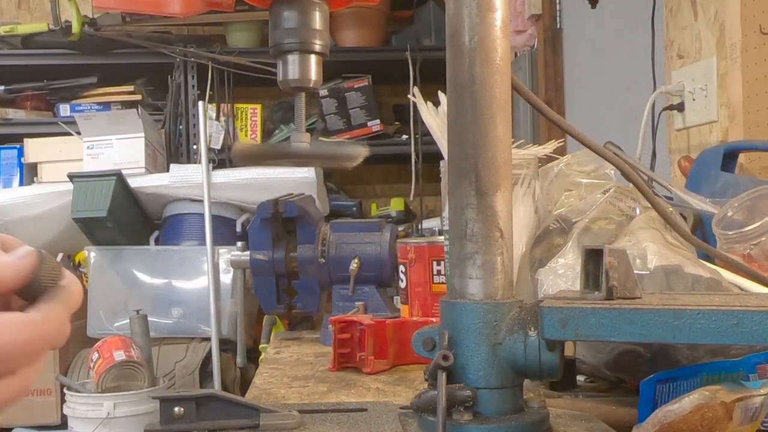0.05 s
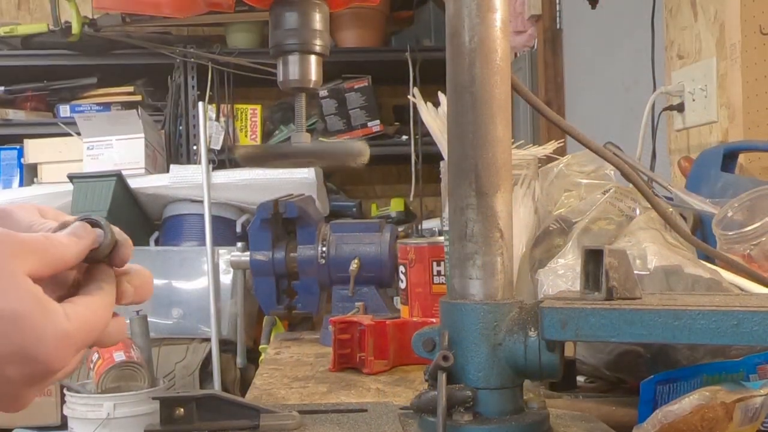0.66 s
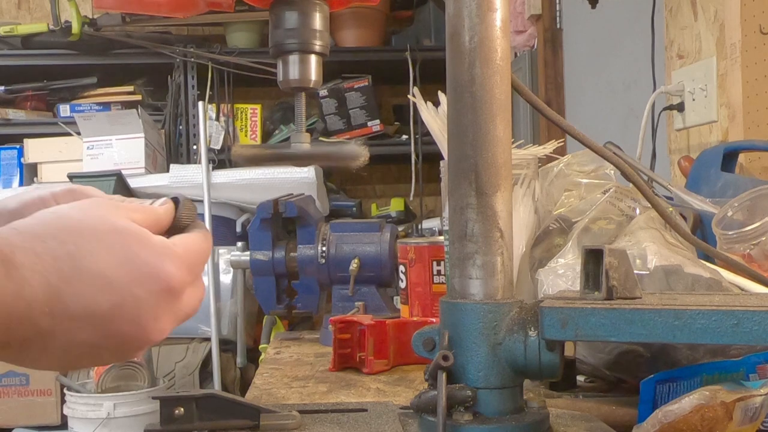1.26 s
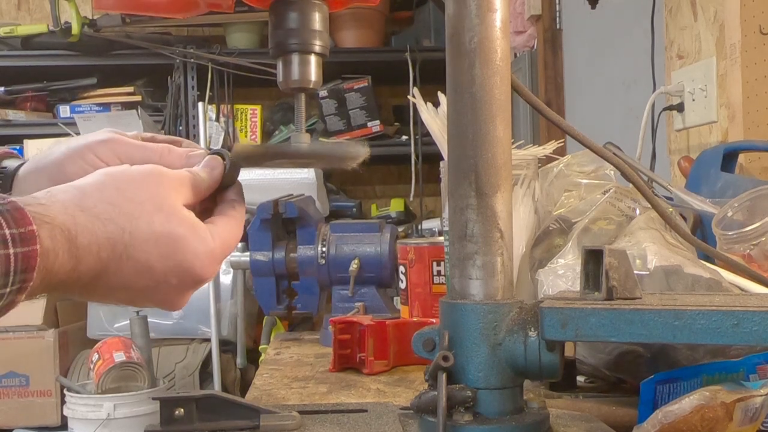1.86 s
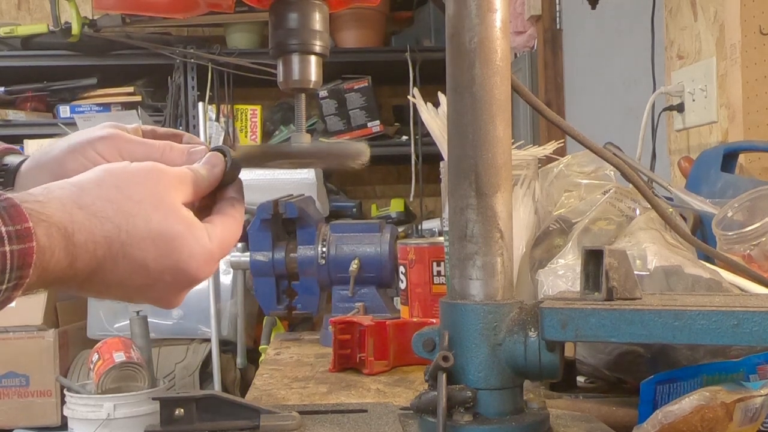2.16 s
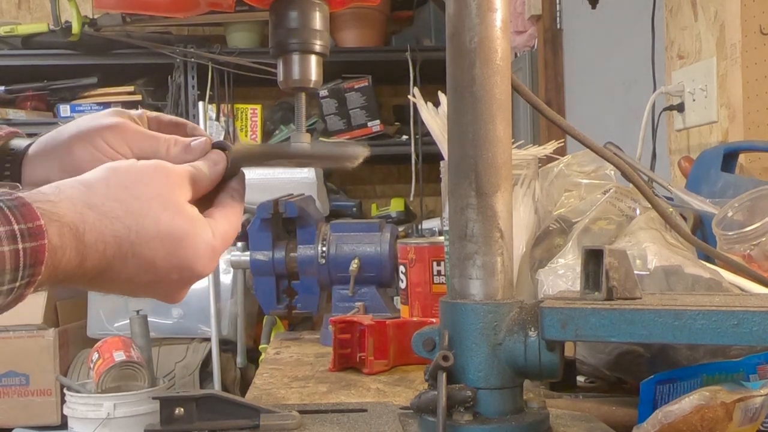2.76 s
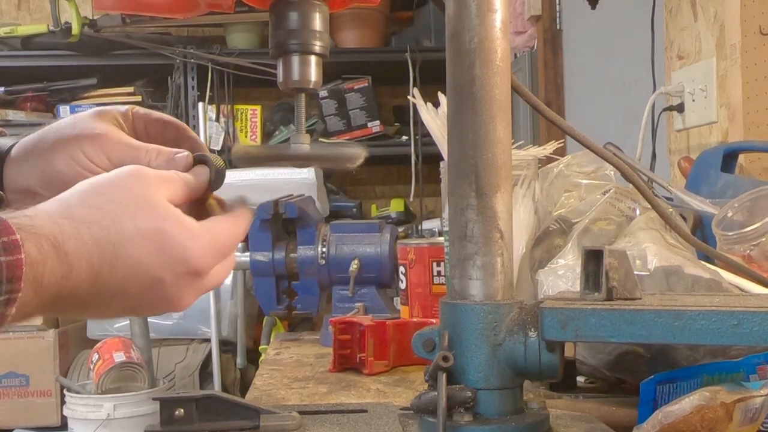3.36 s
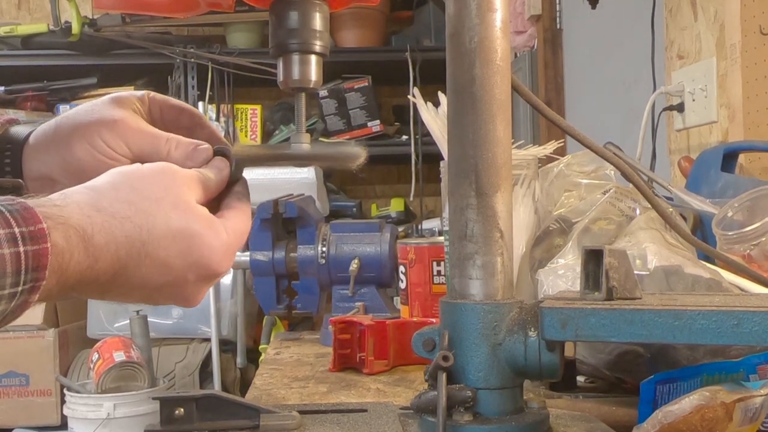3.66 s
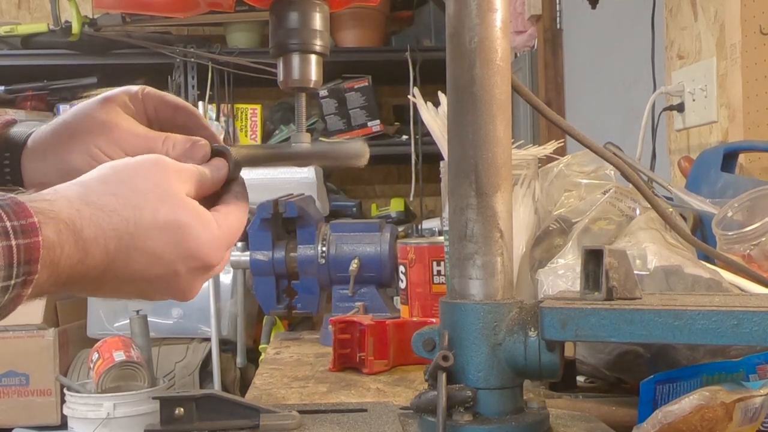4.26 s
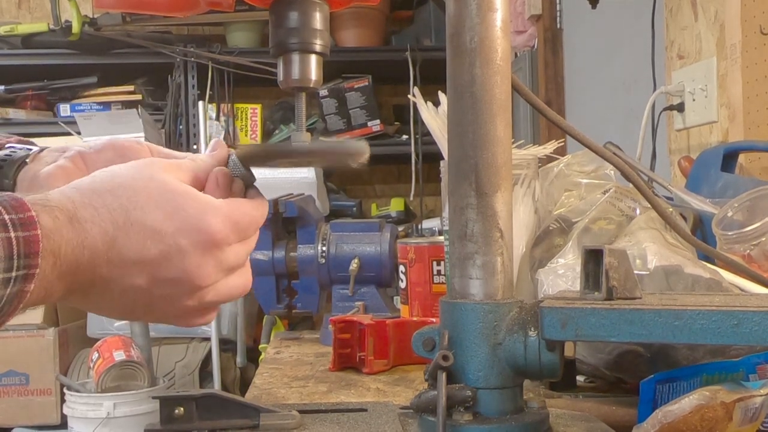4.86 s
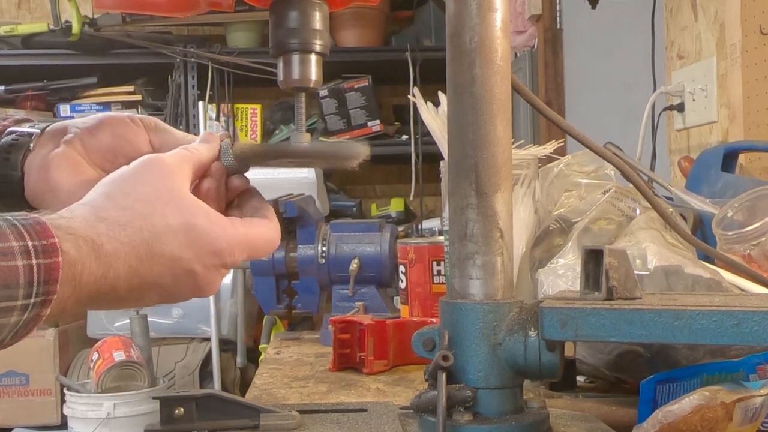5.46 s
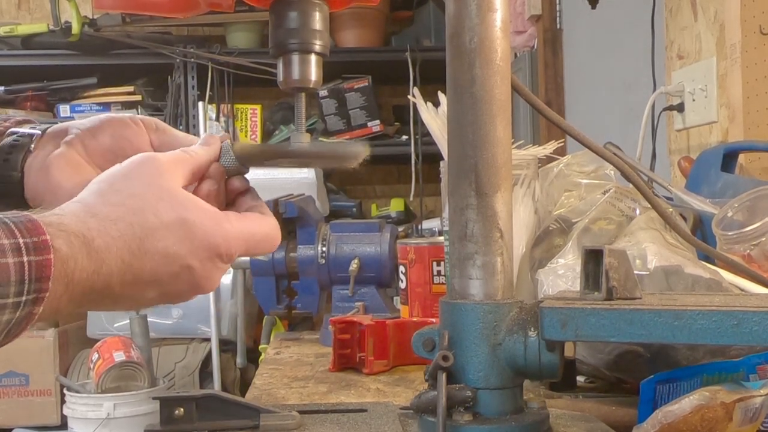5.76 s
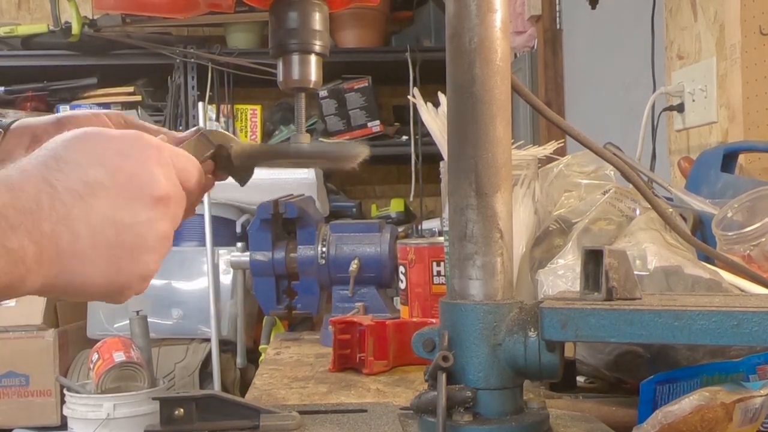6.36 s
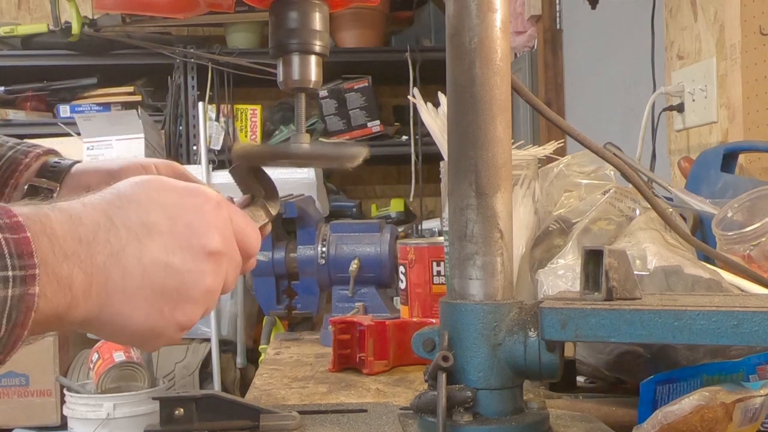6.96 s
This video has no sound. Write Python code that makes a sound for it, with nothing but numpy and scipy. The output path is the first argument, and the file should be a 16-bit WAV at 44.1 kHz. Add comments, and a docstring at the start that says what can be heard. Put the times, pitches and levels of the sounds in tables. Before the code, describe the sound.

A workshop drill press with a wire brush drones low, then switches into fast-forward, a shrill warbling whine over hissing rattle.

```python
"""In a workshop, a stereo microphone pair by a belt-driven drill press, the left side slightly nearer.
The wire wheel spins from the start: the motor hums and beats slowly against the mains, belt and spindle
throb, the iron frame rattles, the bristles tick. From about 1.75 s a steel tool is held to the wheel
and a drone swells. At 2.7 s comes fast-forward: the machine's pitches and rhythms jump up tenfold.
From 4.4 s the hand eases off and leans in again four times; at 6 s there is one faint dull tick."""
import sys
import numpy as np
from scipy import signal
from scipy.fft import rfft, irfft, next_fast_len
from scipy.io import wavfile

SR = 44100
rng = np.random.default_rng(int(sys.argv[2]) if len(sys.argv) > 2 else 0)


def to_wav(s):
    """Save 16-bit WAV."""
    ch = np.atleast_2d(s).T  # columns
    pcm = np.round(np.clip(ch, -1, 1) * 32767)  # PCM
    wavfile.write(sys.argv[1], SR, pcm.astype(np.int16))


N = 318402

FORWARD_AT_S, FORWARD_SPEED = 2.686, 10  # the machine's frequencies are all given at natural pace
MAINS_HZ, POLES, BELT_LOOPS_PER_TURN = 60, 4, .17252

# Partials of belt and spindle: multiple of the loop rate, level/dB, left minus right/dB, left lead/rad
BELT_TONES = [(4, -84.5, 6, 1.5), (5, -76.5, -15, -4.5), (6, -62.5, 9, 1.5), (7, -49.5, 17, -1.0),
              (8, -76, -4, -1.5), (9, -61, -2, -1.1), (10, -68.5, -6, 2), (12, -80, -1, 3),
              (13, -60, -6.5, 4), (14, -63, 11, 2.5), (15, -75, 12, 1), (16, -71, 6, 2),
              (19, -60.5, -2.5, -2.5), (21, -54, 15, -3)]
# Partials of the motor shaft: multiple of the turn rate, level/dB, left minus right/dB, left lead/rad
SHAFT_TONES = [(1, -68, -8, -1.8), (2, -58, -3, -0.2), (3, -61, 9, 0.4), (4, -42, 3, -0.3),
               (5, -50, 1, -0.2), (6, -48, 0, -0.0), (7, -58, 1, -0.4), (8, -53, 3, -0.2)]
# Magnetic hum: multiple of twice the mains frequency (120 Hz), level/dB, left minus right/dB,
# left lead/rad
HUM_TONES = [(1, -41, -9, -.1), (2, -50, 0, .1), (3, -43.5, 0, 0), (5, -56, -7, 1.1), (6, -57, 4, -2.5)]
# Bearings and pulleys: f/Hz, level/dB, left minus right/dB, left lead/rad
BEARING_TONES = [(74.3, -67, 20, -1.0), (84.0, -64, 12, 0.6), (132.6, -60, 1, -0.0), (149.5, -55, 0, 0.1),
                 (165.9, -61, 1, -0.3), (208.9, -58, 3, -0.2), (324.1, -56, -1, 0.0), (395.7, -50, -2, 0.1),
                 (405.9, -46, -2, 0.2), (410.7, -54, -2, 0.1), (433.9, -55, -3, 0.3),
                 (525.9, -58, -3, -0.1), (995.4, -56, -6, -0.2)]
# Broad colour of the rattle: f/Hz, level per Hz/dB
RATTLE_COLOUR = [(8, -95), (20, -93), (50, -81), (80, -75), (110, -64.5), (220, -68), (400, -54),
                 (640, -74), (900, -72.5), (1800, -77), (5000, -78), (7500, -91), (10500, -93.5),
                 (14800, -113.4)]
# Resonances and dips of frame, belt guard and table: f/Hz, width/Hz, gain/dB
FRAME_RESONANCES = [(120.5, 3.8, 6.5), (160.4, 6.2, 6), (291, 140, -2), (344.8, 17.6, -10),
                    (392.4, 52, -4.5), (591, 27, 5), (725, 36, 5.5), (901, 64, 6), (995, 31, 12),
                    (1058, 46, 9.5), (1167, 112, 12), (1220, 28, -5), (1357, 82, 13), (1455, 21, 5),
                    (1554, 53, 9), (1826, 41, 10), (2196, 31, 12.5), (2770, 420, 6.5), (3130, 86, -11),
                    (3500, 160, 4), (4050, 580, 5.5), (5030, 58, 9.5), (5800, 660, 5), (9140, 450, 8)]
# Colour of the bristle ticks: f/Hz, level per Hz/dB
BRISTLE_COLOUR = [(500, -100), (2500, -80.5), (5000, -84), (7500, -119), (10500, -99), (15000, -119)]
# Drone of table and tool under pressure: f/Hz, level per Hz/dB
DRONE_COLOUR = [(100, -110), (190, -86), (245, -69.5), (300, -82), (600, -110)]
# Spread of the noise at the microphones: f/Hz, side minus mid/dB, left minus right/dB
STEREO_SPREAD = [(30, 1, 0.5), (86, -20, 9.5), (124, -15, -0.5), (200, -12.5, 2.5), (397, -15.5, -1.5),
                 (660, 1, -3), (1140, -12.5, -1), (1400, -5.5, 5), (2380, -8.5, -2), (4140, -11, 0),
                 (6460, 2.5, -6), (15000, -5.5, 2)]
# The shaft slips behind half the mains frequency, more once the tool presses: t/s, slip/Hz
STEADY_SLIP = [(0, .311), (1.3, .282), (2.1, .358), (4.3, .351), (5.7, .413), (7.2, .424)]
# The motor's vibration, apart from the easings: t/s, level/dB
MOTOR_VIBRATION = [(0, 0.5), (1.4, 1.5), (3.3, 1), (4.3, -0.1), (7.2, -0.7)]
# The hand eases the tool off the wheel and leans in again: middle t/s, length/s, slip relieved/Hz
HAND_EASES = [(4.68, .52, .075), (5.30, .52, .110), (6.01, .38, .115), (6.61, .55, .107)]
# A faint dull tick: t/s, peak level/dB, decay/s
DULL_TICKS = [(6.023, -30, .0001)]


def undb(db):
    """Decibels to gain."""
    return 10 ** (np.asarray(db) / 20)


def over_hz(table, hz):
    """Columns of a table, joined by straight lines on a log-frequency axis."""
    points, *columns = np.transpose(table)
    return [np.interp(np.log(hz + 1), np.log(points), column) for column in columns]


def walk(axis, rate):
    """Smooth chance with spread near 1 that changes rate times per unit of the axis."""
    knots = rng.standard_normal(4096)
    place = (axis - axis[0]) * rate
    k, ease = place.astype(int), np.sin(np.pi / 2 * (place % 1)) ** 2
    return 1.15 * (knots.take(k, mode="wrap") * (1 - ease) + knots.take(k + 1, mode="wrap") * ease)


def tone(turns, db, pan_db, lead):
    """One partial as the two microphones get it; db is its rms level."""
    gains = undb(np.array([[pan_db], [-pan_db]]) / 2)
    angle = 2 * np.pi * (turns % 1) + np.array([[lead], [-lead]]) / 2
    return 2 * undb(db) * gains / np.linalg.norm(gains) * np.cos(angle)


def radiate(drive, colour, speed, resonances=(), top_hz=15000, left_lead_s=1.4e-5):
    """Colour a white mid and side drive and carry it to the microphones; Hz and s hold at speed 1."""
    count = drive.shape[1]
    size = next_fast_len(count)
    hz = np.fft.rfftfreq(size, 1 / SR) / speed
    db = over_hz(colour, hz)[0]
    db += sum(peak / (1 + (2 * (hz - f) / width) ** 2) for f, width, peak in resonances)
    db += .95 * walk(hz, 1 / 11)  # reflections from bench and shelves comb the spectrum finely
    mid, side = rfft(drive, size) * undb(db) * (hz < top_hz) * np.sqrt(SR / 2 / speed)
    side_db, pan_db = over_hz(STEREO_SPREAD, hz)
    side *= undb(side_db)
    left = (mid + side) * undb(pan_db / 2) * np.exp(2j * np.pi * hz * left_lead_s)
    right = (mid - side) * undb(-pan_db / 2)
    return irfft(np.array([left, right]), size)[:, :count]


def motor(clock, shaft, swell_db, pressure_db, waver_db=1.2, sideband_db=-54, sideband_turns=.634):
    """The shaft's fourth partial beats against twice the mains frequency; more slip, faster beat."""
    uneven = shaft + .0087 * walk(clock, 9)
    field = 2 * MAINS_HZ * clock
    # the pole-pass partial and its octave lock to the field; the rest cross the frame at any phase
    locked = {POLES: 0, 2 * POLES: 2 * sideband_turns - .5}
    out = 0
    for k, db, pan, lead in SHAFT_TONES:
        offset = locked[k] if k in locked else rng.random() + .076 * walk(clock, 2)
        out += tone(k * uneven + offset, db + swell_db + waver_db * walk(clock, 6.5), pan, lead)
    for k, db, pan, lead in HUM_TONES:
        # the lowest hum shakes the housing and swells with it; its overtones hold steady
        out -= tone(k * field + (k > 2) * rng.random(), db + swell_db * (k == 1), pan, lead)
    # under load the poles modulate the field, so the hum's octave throbs as well
    return out + tone(field + POLES * uneven + sideband_turns, sideband_db + pressure_db, 0, 0)


def drive_train(clock, belt, belt_waver_db=.4, wander_turns=.092):
    """Belt and spindle repeat once a loop; bearings and pulleys sing at their own wandering pitches."""
    out = 0
    for k, db, pan, lead in BELT_TONES:
        out += tone(k * belt + rng.random(), db + belt_waver_db * walk(clock, 3), pan, lead)
    for hz, db, pan, lead in BEARING_TONES:
        out += tone(hz * clock + wander_turns * walk(clock, 1.3), db + walk(clock, 3.3), pan, lead)
    return out


def shaking(clock, shaft, belt, by_shaft=.088, by_hum=.1, by_buzz=.11, by_belt=.057, flicker_db=.36):
    """Loose parts and bristles are hit in time with shaft, hum and belt; a gain of mean power 1."""
    field_angle = 4 * np.pi * MAINS_HZ * clock
    shake = 1 + by_shaft * np.cos(2 * np.pi * shaft) + by_hum * np.cos(field_angle)
    shake += by_buzz * sum(np.cos(k * field_angle + k) for k in (2, 3))
    shake += by_belt * sum(np.cos(2 * np.pi * (k * belt + rng.random())) for k in (2, 7, 9, 16))
    shake *= undb(flicker_db * walk(clock, 14))
    return shake / np.sqrt(np.mean(shake ** 2))


def frame_rattle(shake, speed):
    """Shaken loose parts ring the iron frame, belt guard and table."""
    return radiate(shake * rng.standard_normal((2, len(shake))), RATTLE_COLOUR, speed, FRAME_RESONANCES)


def bristles(shake, speed, per_second=900, scatter_db=3.5):
    """Single wires of the wheel flick and tick, each with its own strength."""
    count = len(shake)
    hit = rng.random(count) < per_second * speed / SR
    flicks = hit * rng.standard_normal((2, count)) * undb(scatter_db * rng.standard_normal(count))
    return radiate(shake * flicks / np.std(flicks), BRISTLE_COLOUR, speed)


def tool_load(t, swell_db_per_hz=21, pressure_db_per_hz=83, reference_slip_hz=.37):
    """The tool's pressure slows the shaft and feeds the drone; eased, the freed motor shakes harder."""
    steady_hz = np.interp(t, *np.transpose(STEADY_SLIP))
    relief_hz = sum(depth * np.cos(np.pi * (t - middle) / length) ** 2 * (abs(t - middle) < length / 2)
                    for middle, length, depth in HAND_EASES)
    swell_db = np.interp(t, *np.transpose(MOTOR_VIBRATION)) + swell_db_per_hz * relief_hz
    # only a share of each easing reaches the drone and the hum's throb
    pressure_db = pressure_db_per_hz * (steady_hz - .42 * relief_hz - reference_slip_hz)
    return steady_hz - relief_hz, swell_db, pressure_db


def table_drone(pressure_db, speed):
    """Table and tool drone in a band of noise that grows with the pressure."""
    return radiate(undb(pressure_db) * rng.standard_normal((2, len(pressure_db))), DRONE_COLOUR, speed)


def drill_press(clock, shaft, swell_db, pressure_db, speed):
    """The whole machine at the microphones over one stretch of its own clock; shaft counts turns."""
    belt = BELT_LOOPS_PER_TURN * shaft
    shake = shaking(clock, shaft, belt)
    noise = frame_rattle(shake, speed) + table_drone(pressure_db, speed)
    tones = motor(clock, shaft, swell_db, pressure_db) + drive_train(clock, belt)
    return noise + tones + bristles(shake, speed)


def dull_tick(t):
    """A short one-sided push, heard as a dull tick midway between the microphones."""
    return sum(undb(db) * np.exp(-abs(t - start) / decay) * (t >= start)
               for start, db, decay in DULL_TICKS)


def scene():
    """From one spot in the workshop: the machine at its natural pace, then in fast-forward."""
    t = np.arange(N) / SR
    fast = t >= FORWARD_AT_S
    step = np.where(fast, FORWARD_SPEED, 1) / SR
    slip_hz, swell_db, pressure_db = tool_load(t)
    clock = np.cumsum(step)
    # a four-pole motor turns at half the mains frequency, less its slip
    shaft = np.cumsum((MAINS_HZ / 2 - slip_hz) * step)
    controls = np.array([clock, shaft, swell_db, pressure_db])
    natural = drill_press(*controls[:, ~fast], speed=1)
    hurried = drill_press(*controls[:, fast], speed=FORWARD_SPEED)
    return np.hstack([natural, hurried]) + dull_tick(t)


def record(dry, knee=.32, top_hz=15750):
    """Behind the microphones the highest peaks are rounded slightly and the top is cut steeply."""
    rounded = knee * np.tanh(dry / knee)
    lowpass = signal.ellip(12, .1, 80, top_hz, fs=SR, output="sos")
    return signal.sosfilt(lowpass, .75 * dry + .25 * rounded)


dry = scene()
out = record(dry)
to_wav(out)
```